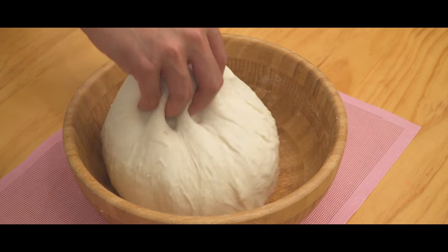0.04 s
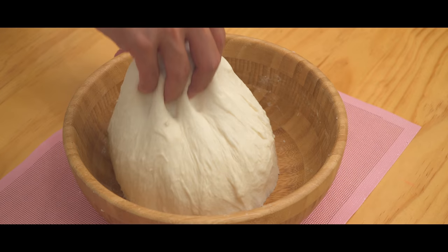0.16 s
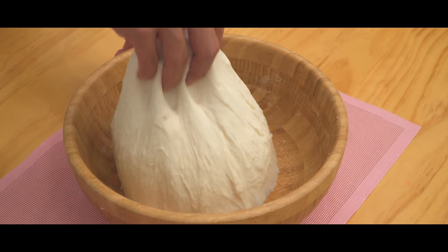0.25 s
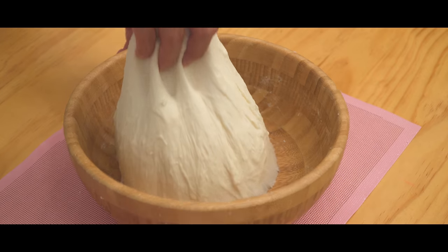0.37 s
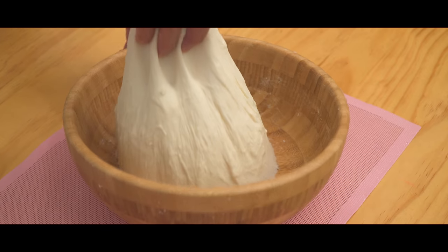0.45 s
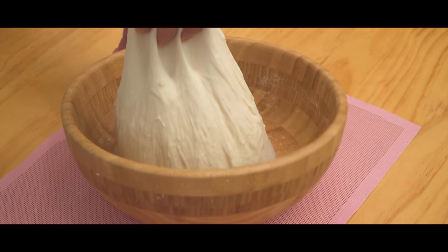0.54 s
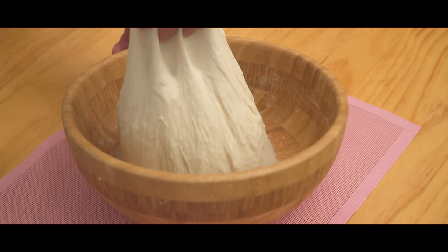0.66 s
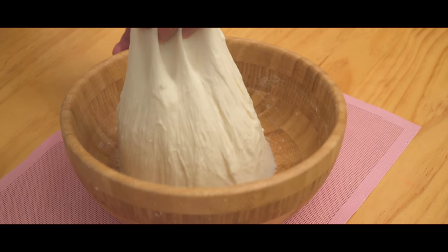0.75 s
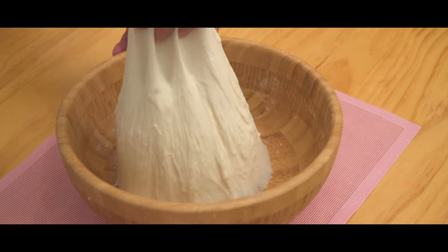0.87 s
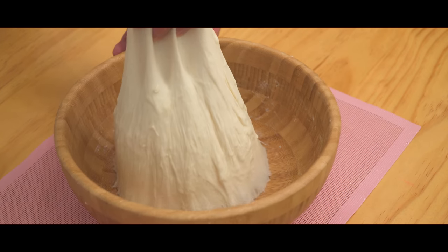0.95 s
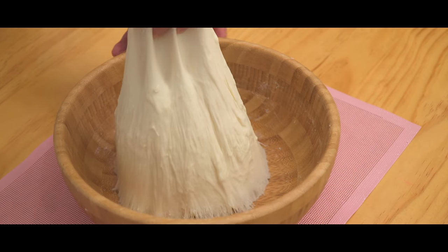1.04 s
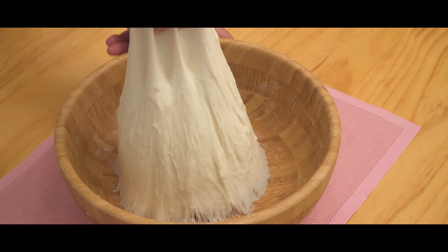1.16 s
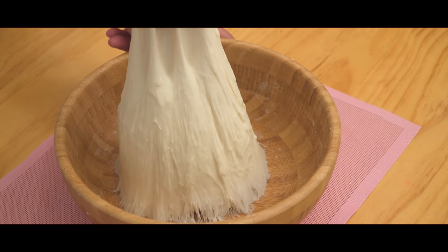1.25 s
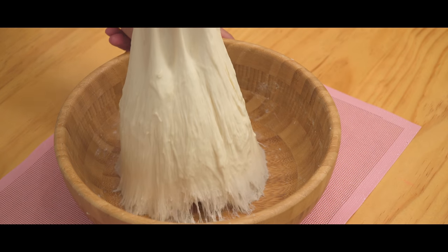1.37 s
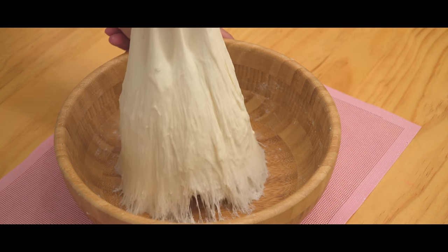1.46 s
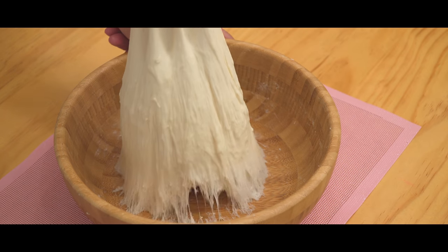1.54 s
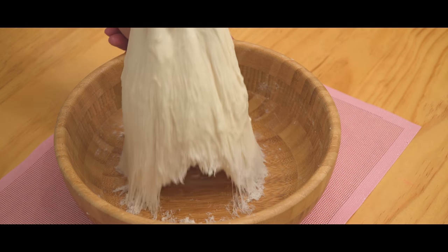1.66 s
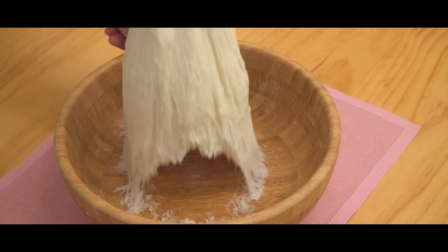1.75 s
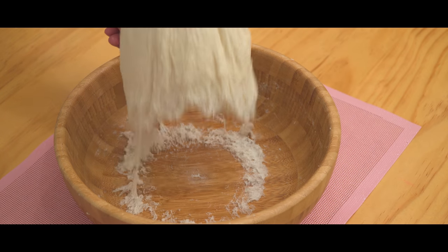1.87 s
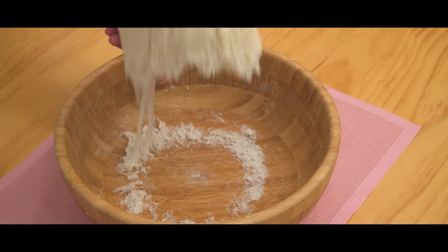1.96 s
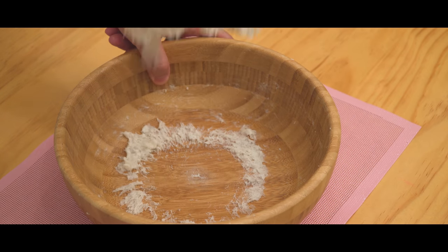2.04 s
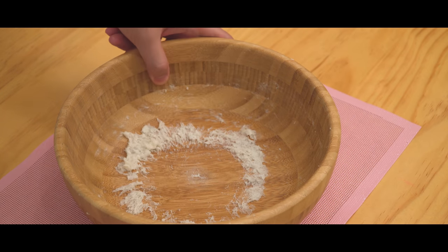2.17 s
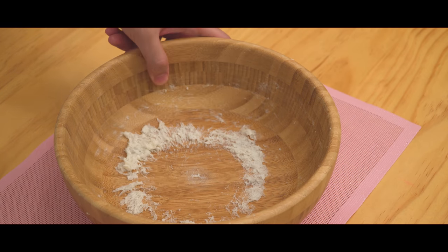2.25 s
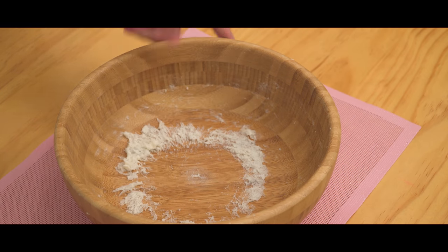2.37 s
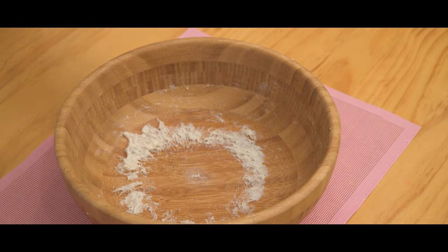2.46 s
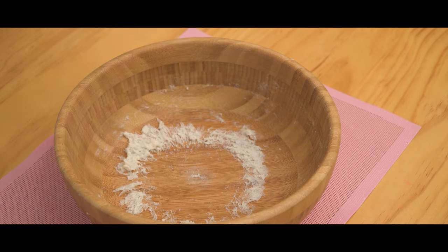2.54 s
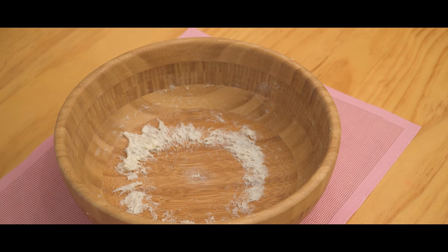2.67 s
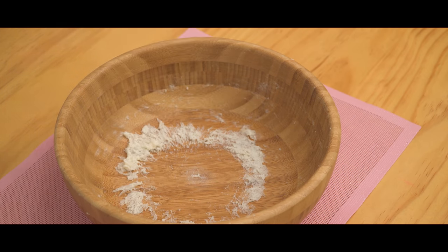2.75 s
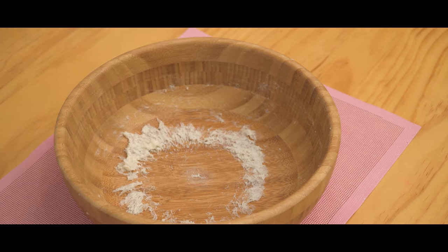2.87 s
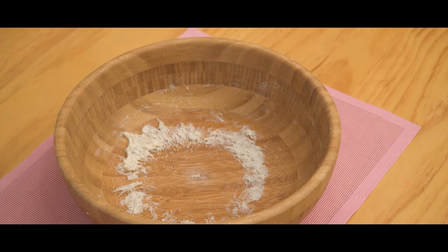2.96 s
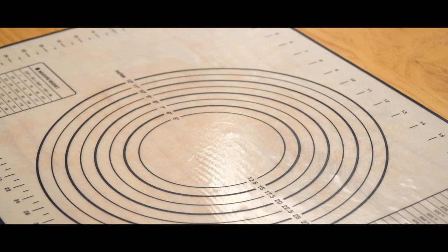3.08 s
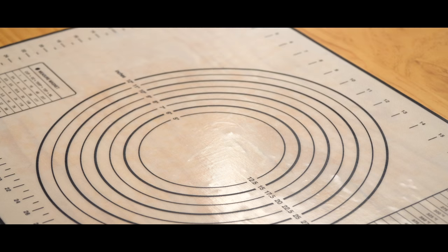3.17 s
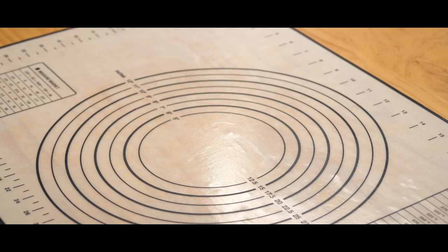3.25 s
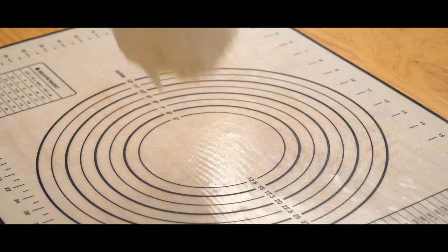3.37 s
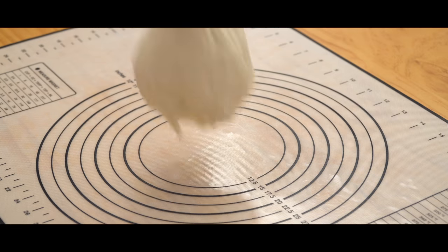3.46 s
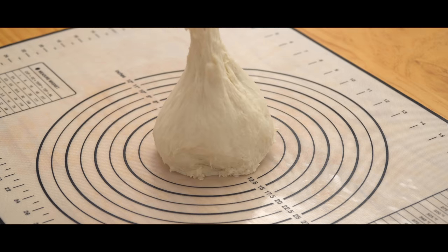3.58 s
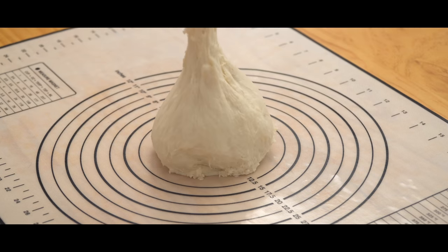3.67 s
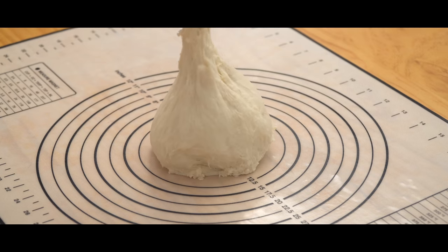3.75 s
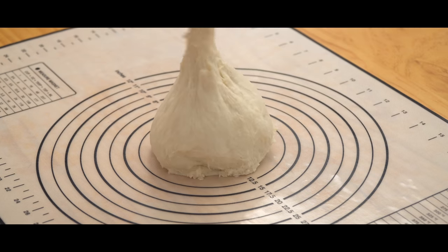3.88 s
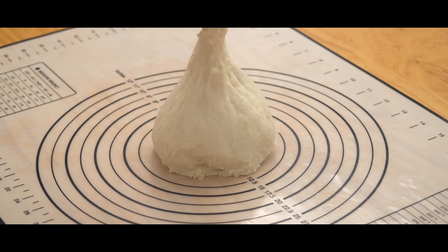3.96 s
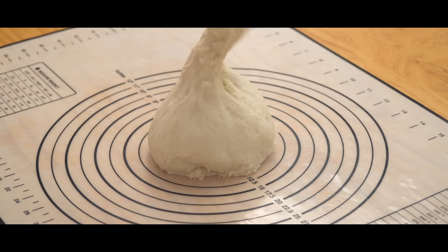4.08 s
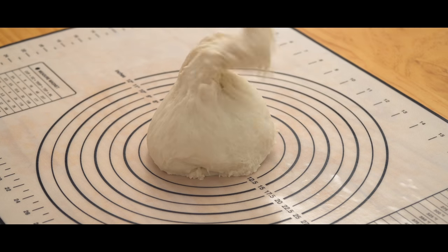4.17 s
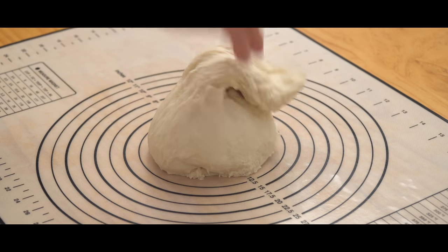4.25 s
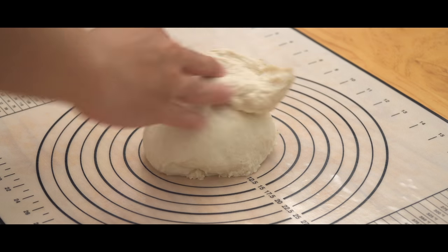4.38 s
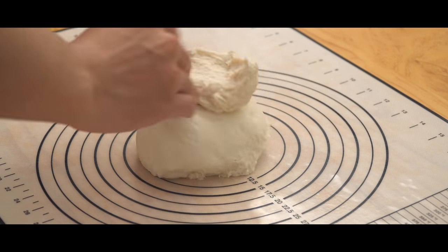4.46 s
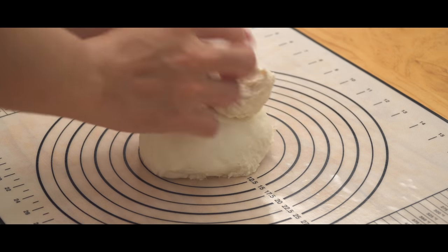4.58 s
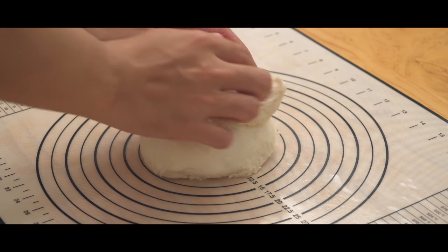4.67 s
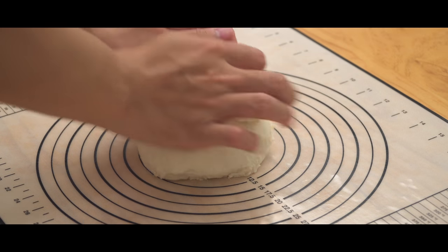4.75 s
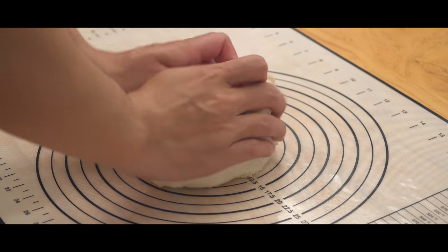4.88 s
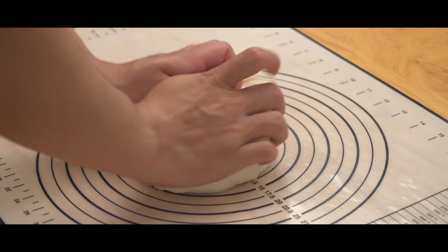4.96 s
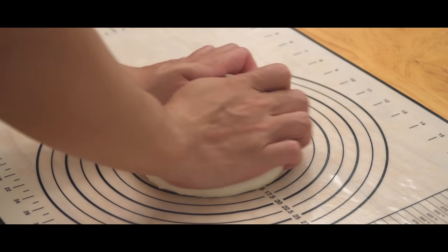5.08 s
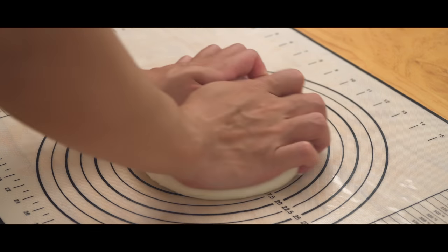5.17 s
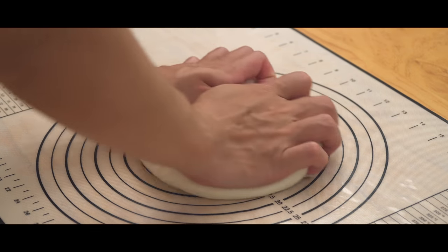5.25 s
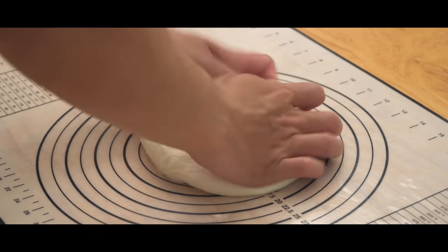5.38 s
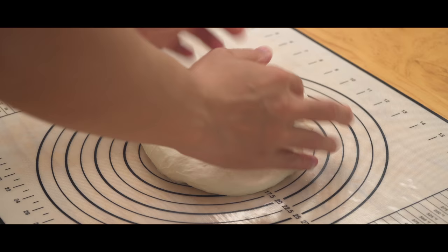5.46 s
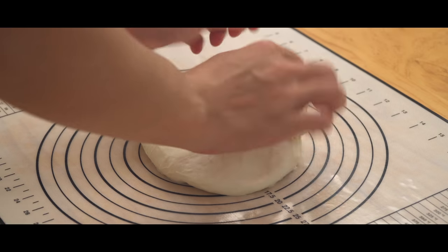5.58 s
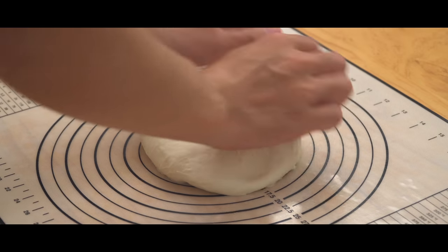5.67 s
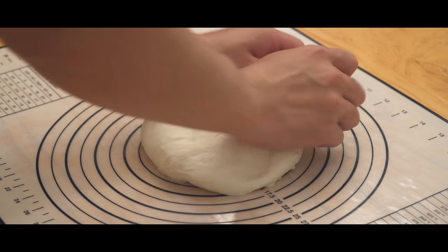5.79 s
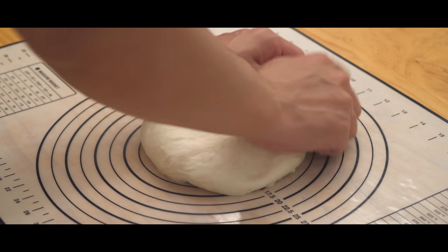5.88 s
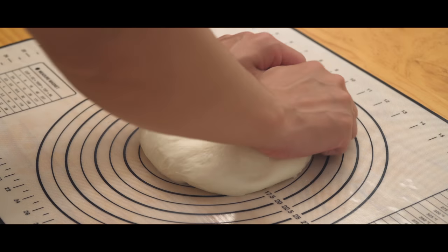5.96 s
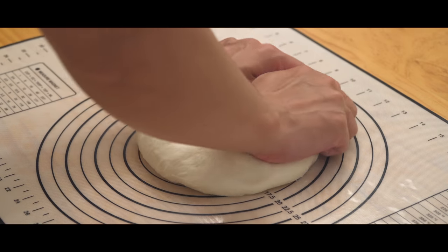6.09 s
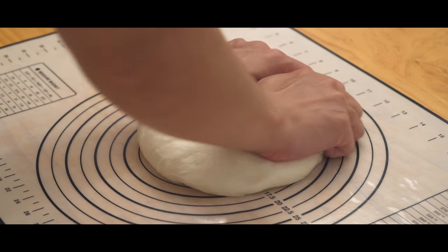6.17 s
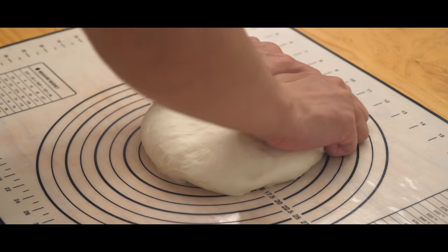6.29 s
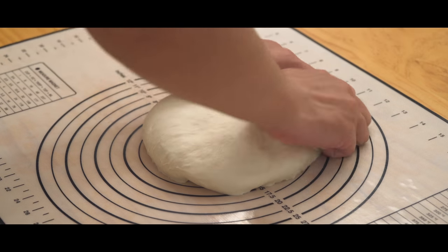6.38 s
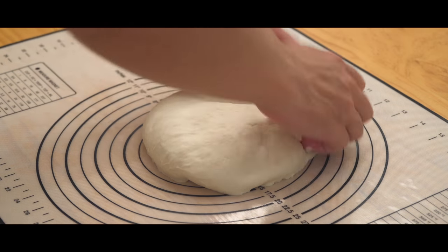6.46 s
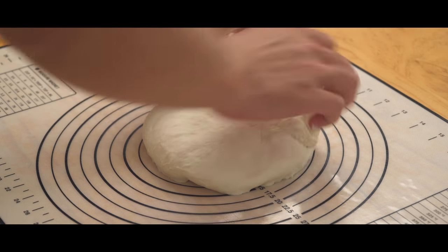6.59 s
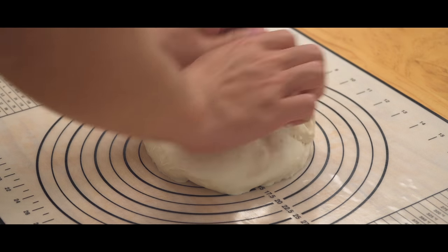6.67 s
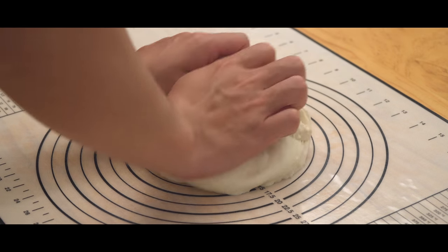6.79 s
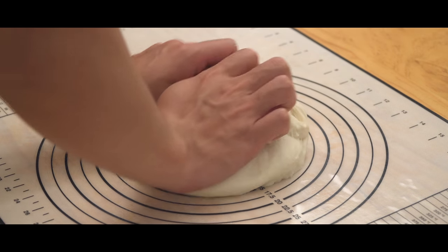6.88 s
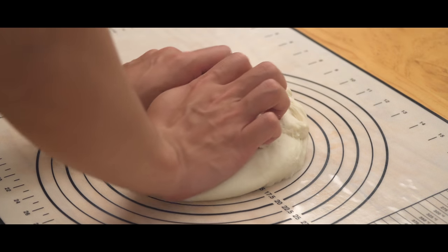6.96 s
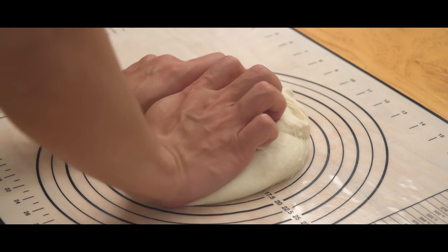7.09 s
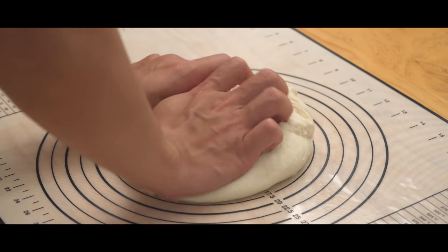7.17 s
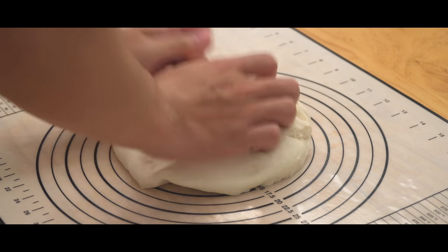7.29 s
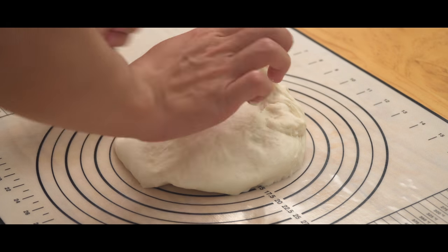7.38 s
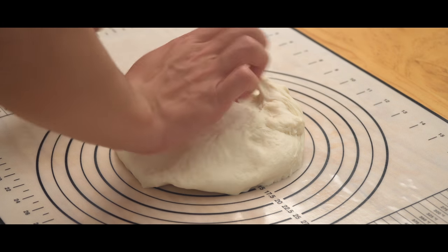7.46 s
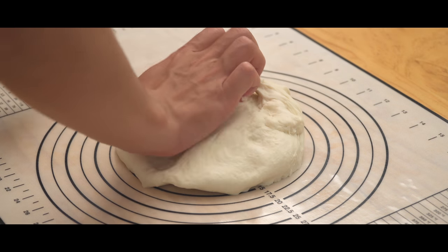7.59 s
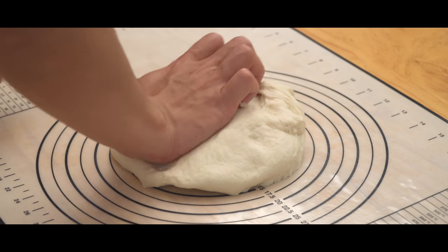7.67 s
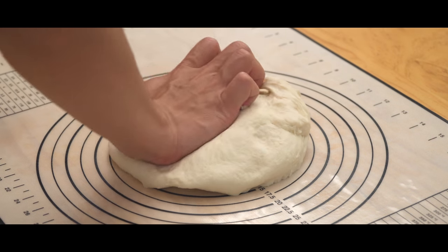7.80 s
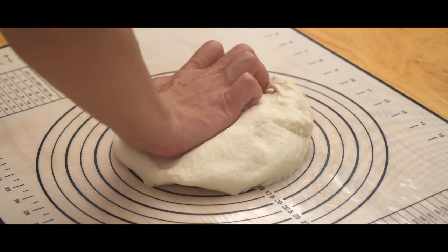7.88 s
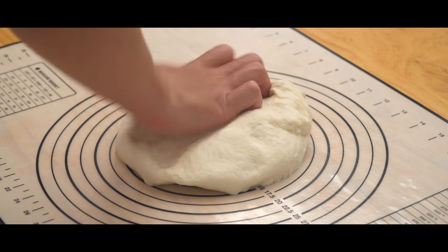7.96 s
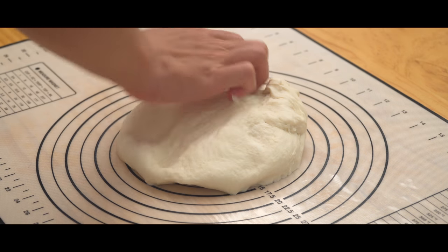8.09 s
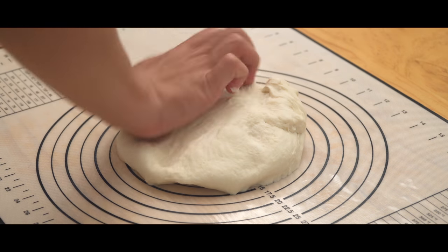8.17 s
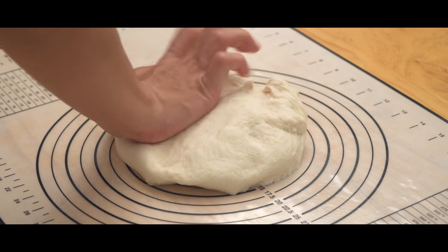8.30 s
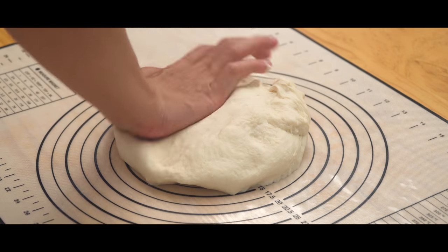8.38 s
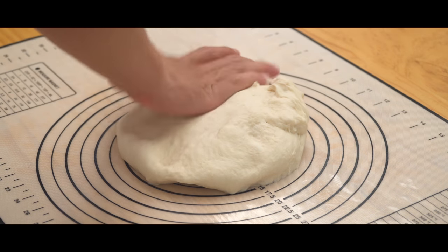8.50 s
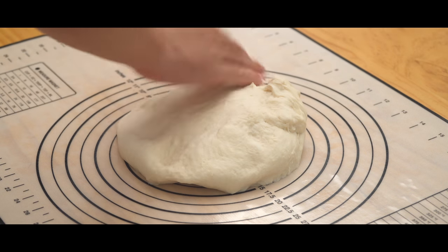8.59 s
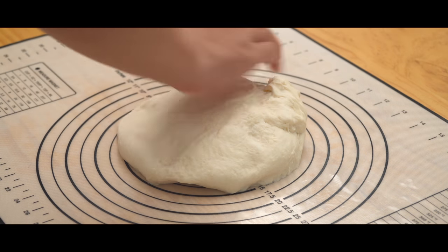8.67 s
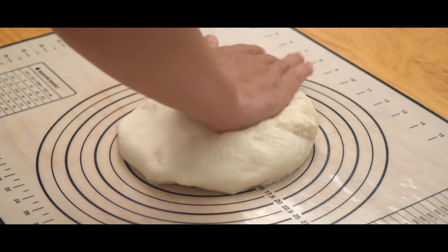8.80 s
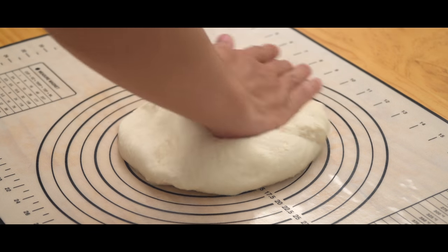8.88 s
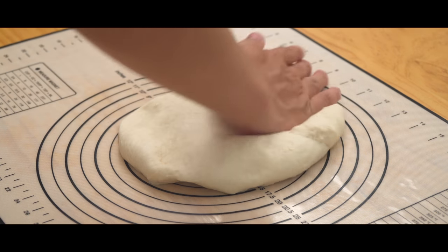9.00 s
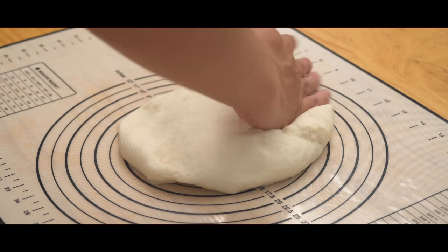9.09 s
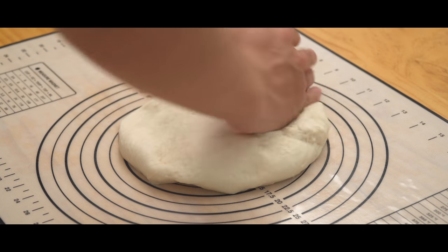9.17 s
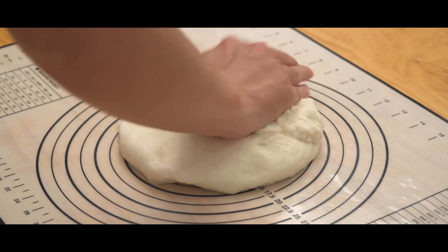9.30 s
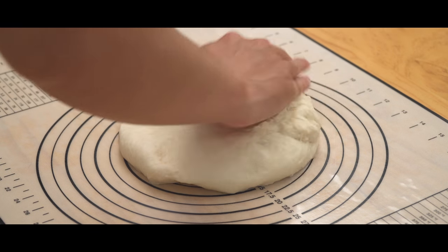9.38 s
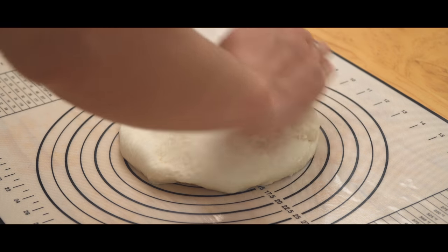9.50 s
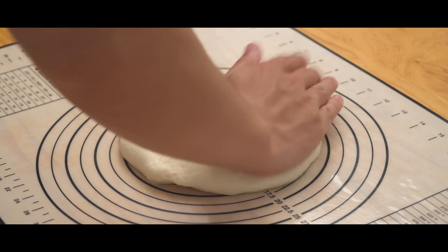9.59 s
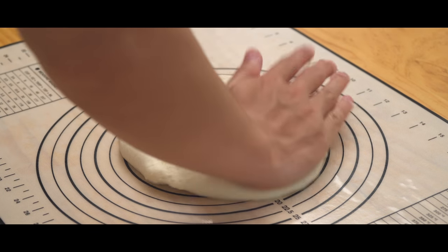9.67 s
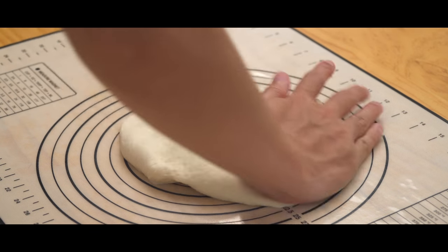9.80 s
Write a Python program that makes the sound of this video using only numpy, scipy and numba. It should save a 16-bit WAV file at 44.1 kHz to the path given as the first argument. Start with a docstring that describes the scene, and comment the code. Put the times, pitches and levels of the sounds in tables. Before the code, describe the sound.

Faint tearing of sticky strands comes first, broken by one woody bowl knock, then stillness. A weighty dough slap shakes the table, followed by irregular kneading: dull pushes, squeezed crackles, ripping adhesive peels that slide down in pitch, and tiny air pops, one of them loud. Close microphone, slight small-room echo, soft hiss and barely audible hum.

```python
"""Sticky dough peels off a mat and palm in dense snaps that ring the air gap beneath, whose pitch falls as it opens.
Slower stretching off a wooden bowl and squeezing fingers crackle as strands let go in clumps.
Air pockets pop as short decaying tones; wet smacks are brief swells of snaps in one resonance.
Blows ring modes of bowl and table, soft pushes wobble the lump, and the table sways near 50 Hz.
A small kitchen adds a diffuse echo, still air, narrow hiss and a faint mains hum."""
import sys
import numpy as np
from scipy import signal
from scipy.fft import rfft, irfft
from scipy.io import wavfile
from numba import njit

SR = 44100
rng = np.random.default_rng(int(sys.argv[2]) if len(sys.argv) > 2 else 0)


def store_pcm(level_fs):
    """Save levels as 16-bit WAV."""
    pcm = np.round(np.clip(level_fs, -1, 1) * 32767).astype(np.int16)
    wavfile.write(sys.argv[1], SR, np.atleast_2d(pcm).T)


N = 433944
T = np.arange(N) / SR  # time axis [s]

# Dough peeling off mat and palm, one row a stroke: (crest time [s], build-up [s], run-out [s],
# relative crackle level [dB], relative fine crackle level [dB], relative tug level [dB],
# nominal pitch of closed air gap [Hz], nominal pitch of open air gap [Hz])
PEELS = [(5.435, 0.081, 0.077, -42.5, -51, -36, 4300, 2400),
         (6.465, 0.085, 0.11, -45.5, -52, -38.5, 2500, 1670),
         (7.288, 0.029, 0.078, -37, -48, -33, 4460, 1800),
         (8.02, 0.039, 0.071, -40, -50, -35.5, 5300, 3670),
         (8.572, 0.077, 0.089, -44, -53.5, -37.5, 4300, 3600),
         (9.112, 0.088, 0.018, -50, -59, -44, 3600, 1500),
         (9.21, 0.033, 0.052, -54, -58.5, -51, 1700, 1620),
         (9.812, 0.011, 0.013, -44, -36.5, -47, 5500, 4900)]
# Colour of the snaps on the mat: (frequency [Hz], level [dB])
MAT_TONE = [(150, -25), (350, -7.5), (650, 2), (1200, 0.5), (1700, -0.5), (4500, -3.5), (6300, -17),
            (9000, -25), (16000, -52)]
# Colour of the fine crackle of a peel: (frequency [Hz], level [dB])
PEEL_TREBLE = [(3000, -6), (6000, -1), (8000, -2.5), (16000, -10)]
# Dough stretching off the bowl: (time [s], relative crackle level [dB])
STRETCH = [(0.0, -59), (0.23, -54), (0.25, -61), (0.52, -59), (0.66, -62.5), (0.69, -55), (0.71, -65.5),
           (1.07, -57), (1.1, -52), (1.39, -57.5), (1.9, -55), (2.0, -69)]
# Fingers gripping the dough: (middle time [s], time from middle to 1/e^2 of the gain [s],
# relative crackle level [dB], relative fine crackle level [dB], relative tug level [dB])
SQUEEZES = [(0.533, 0.12, -63.5, -58, -53), (1.62, 0.24, -75, -51, -60), (1.891, 0.093, -59.5, -52, -55),
            (3.914, 0.04, -54, -46, -75), (4.352, 0.12, -67, -75.5, -61), (4.53, 0.093, -62, -61.5, -56.5),
            (4.89, 0.26, -60.5, -54.5, -56.5), (5.147, 0.065, -62, -55, -62),
            (5.275, 0.15, -64, -60, -57.5), (5.973, 0.23, -64.5, -63.5, -55),
            (6.259, 0.09, -58.5, -60, -46.5), (7.11, 0.23, -60, -64, -55.5),
            (7.965, 0.054, -58, -51, -52.5), (9.492, 0.14, -63, -61, -48.5)]
# Colour of coarse strands: (frequency [Hz], level [dB])
STRAND_TONE = [(200, 7.5), (450, -10.5), (900, -0.5), (1700, 2.5), (2500, 0), (4500, -2), (7000, -11.5),
               (15000, -32)]
# Colour of fine fibres and of the treble echo: (frequency [Hz], level [dB])
FINE_TONE = [(2500, -18), (5000, -4), (8000, 0), (11000, -1), (14000, 0), (16000, -4)]
# Rumble of lump and table under a pull: (frequency [Hz], level [dB])
RUMBLE_TONE = [(25, -12), (60, 0), (130, -4.0), (200, -2.0), (270, -11.5), (400, -20), (800, -25.5), (3000, -49.5)]
# Air pockets bursting: (time [s], level of the ringing [dB], pitch [Hz])
POPS = [(0.9235, -38, 8000), (1.946, -36, 13100), (1.989, -41, 12000), (2.034, -34, 13200),
        (4.349, -34.5, 1730), (4.741, -34, 3100), (4.888, -33, 9000), (4.955, -32, 1520),
        (6.338, -17.5, 4060), (6.423, -13, 4000), (6.870, -32.5, 1770), (7.071, -31, 4480),
        (7.433, -31, 3740), (8.231, -36.5, 3280), (9.010, -6.5, 3860), (9.013, -19.5, 4500),
        (9.539, -32, 1350), (9.665, -27, 1760), (9.802, -31, 1820), (9.805, -14, 9200)]
# Wet smacks as dough meets or leaves a surface: (time [s], level [dB], pitch [Hz], length [s])
SMACKS = [(1.099, -54.5, 4300, 0.058), (1.218, -56, 4470, 0.067), (2.266, -64, 4470, 0.072),
          (2.33, -45, 2070, 0.0073), (3.623, -49, 2300, 0.01), (4.924, -54, 12000, 0.015),
          (5.424, -50, 4270, 0.036), (5.494, -54, 7500, 0.02), (5.511, -44, 1440, 0.015),
          (5.959, -65, 9000, .04), (6.216, -53, 1550, 0.013), (6.266, -52, 7940, 0.01),
          (6.618, -56.5, 1360, 0.034), (7.009, -53, 5750, 0.0049), (7.133, -53, 12000, 0.016),
          (7.262, -48, 3550, .02), (7.342, -48.5, 7400, 0.026), (8.007, -37.5, 4500, .012),
          (8.397, -50, 4430, 0.016), (8.4245, -49.5, 6230, 0.0075), (9.413, -58, 1830, 0.02),
          (9.658, -46, 1800, 0.015)]
# Dough and palm slapping mat and table: (time [s], knock level [dB], sway level [dB])
SLAPS = [(3.620, -18.5, -12), (6.338, -25, -34), (9.669, -27.5, -28)]
# Lifted bowl dropping back on the table: (time [s], knock level [dB], sway level [dB])
BOWL_KNOCKS = [(1.039, -39.5, -44), (1.082, -32.5, -40), (1.204, -8.5, -24)]
# Soft pushes of hand and dough: (time [s], thud level [dB], sway level [dB])
THUMPS = [(2.332, -42, -47), (4.279, -49, -58), (4.756, -48, -37), (4.804, -41, -62), (4.946, -62, -27),
          (5.488, -27, -37), (5.518, -36, -25.5), (6.221, -37.5, -39), (6.545, -31, -33),
          (6.811, -40, -36.5), (7.296, -25.5, -18.5), (7.379, -21.5, -22), (7.433, -21.5, -38),
          (7.715, -36.5, -34.5), (8.014, -31, -21.5), (8.058, -28, -31), (8.103, -31, -36),
          (8.193, -33.5, -54), (8.232, -31, -38), (8.279, -33, -25), (8.345, -29, -28.5), (8.576, -27, -22),
          (8.646, -29, -50), (8.822, -30.5, -32), (9.012, -25, -34), (9.108, -31, -50), (9.234, -34.5, -56),
          (9.463, -36, -68), (9.536, -33.5, -29), (9.668, -27, -49)]
# Modes of the wooden bowl: (nominal frequency [Hz], relative level [dB], 60 dB decay time [s])
BOWL = [(155.4, 2, 0.13), (204.3, 0.5, 0.14), (245, -14, 0.17), (305, -14, 0.12), (376, -21.5, 0.13),
        (444, -26, 0.095)]
# Modes of the table top under the mat: (nominal frequency [Hz], relative level [dB], 60 dB decay time [s])
TABLE = [(132, 5.5, 0.069), (199, 4, 0.11), (243.5, 2.5, 0.14), (309, -6.5, 0.19), (363, -19, 0.23),
         (412, -8, 0.096), (500, -7, 0.12), (868, -11, 0.084), (1567, -6, 0.044)]
# Colour of the main echo: (frequency [Hz], level [dB])
ECHO_TONE = [(60, -5.5), (300, 4.5), (4500, 0.5), (8000, 1.0), (16000, -39)]
# Colour of the still kitchen air: (frequency [Hz], level [dB])
KITCHEN = [(30, -15), (50, -2.5), (75, -8.5), (200, -13.5), (500, -20), (1000, -26), (3000, -28.5),
           (5000, -29), (6500, -35.5), (16000, -37.5)]
# Narrow bands of steady hiss: (centre [Hz], width before narrowing [Hz], level [dB])
HISS = [(3340, 200, -80), (4296, 400, -73), (5180, 320, -76)]

# Peel: breaks loose, swells to its crest, sags while dough keeps coming away, dies once free
PEEL_ATTACK_DB_PER_S, PEEL_SWELL_DB, PEEL_SAG_DB, PEEL_RELEASE_DB_PER_S = 550, 10.5, 5.5, 600
# The table feels the pull a little after the skin lets go, and settles more slowly
TUG_LAG_S, TUG_RELEASE_DB_PER_S = 0.012, 216
GAP_OPENS_S = 0.0088  # time constant of the fall in pitch around the crest
# Strands get thinner as the lump rises: fine crackle gains on coarse at this rate
THINNING_DB_PER_S = 5
# Pitch of the lump under a light hand; a sway of LEAN_DB lowers it to two thirds
THUD_HZ, LEAN_DB = 206, -16
SWAY_HZ, SWAY_T60_S = 51.43, 0.55
KITCHEN_DB, HUM_HZ, HUM_DB = -60, 100.2, -62
TOP_HZ = 15900  # upper edge of the pass-band


def peels(rate=5000, scatter_db=4.0, gap_width=0.56, gap_db=-2, mat_db=-3, fine_db=-2, jerk_db=2, flutter=0.045):
    """Adhesive peeling: jerky bond breaking excites an air cavity whose resonance falls as it opens."""
    coarse_gain, fine_gain, pull = np.zeros(N), np.zeros(N), np.zeros(N)
    gap_hz = np.full(N, float(PEELS[0][-2]))
    t = T[:SR] - .5
    for crest, build_s, run_s, crackle_db, treble_db, tug_db, closed_hz, open_hz in PEELS:
        start = crest + t[0]
        speed = stroke(t, build_s, run_s, PEEL_RELEASE_DB_PER_S)
        tug = stroke(t, build_s, run_s, TUG_RELEASE_DB_PER_S)
        add(coarse_gain, start, undb(crackle_db) * speed)
        add(fine_gain, start, undb(treble_db) * speed)
        add(pull, start + TUG_LAG_S, undb(tug_db) * tug)
        begun = T > crest - 2 * build_s
        still_closed = (1 - np.tanh((T[begun] - crest) / (2 * GAP_OPENS_S))) / 2
        gap_hz[begun] = open_hz + (closed_hz - open_hz) * still_closed
    # the same jerks move both snap strength and gap pitch
    jerk = unit(band(rng.standard_normal(N), 23, 55))
    gap_hz = gap_hz * np.exp(flutter * jerk)
    mat, gap, fine = (undb(jerk_db * jerk) * snaps(rate, scatter_db) for _ in range(3))
    for _ in range(2):
        gap = band(gap, gap_hz, gap_width * gap_hz)
    gap = unit(gap / np.sqrt(gap_hz))  # offsets the wider band at high pitch
    coarse = coarse_gain * (undb(gap_db) * gap + undb(mat_db) * colour(mat, MAT_TONE))
    fine = fine_gain * undb(fine_db) * colour(fine, PEEL_TREBLE)
    return coarse + fine + tugs(pull, knock_db=6.5, sway_db=3.0)


def stroke(t, build_s, run_s, release):
    """Envelope of one peel at t seconds from its crest: attack, swell, sag, release [dB/s]."""
    attack = PEEL_ATTACK_DB_PER_S * np.minimum(t + build_s, 0)
    swell = PEEL_SWELL_DB * np.clip(t / build_s, -1, 0)
    sag = PEEL_SAG_DB * np.clip(t / run_s, 0, 1)
    return undb(attack + swell - sag - release * np.maximum(t - run_s, 0))


def stretch(release_s=0.047):
    """Viscoelastic stretching: one long pull out of the bowl thins the strands, shifting energy to fine crackle."""
    s, db = np.transpose(STRETCH)
    pull = undb(np.interp(T, s, db)) * np.exp(-np.maximum(T - s[-1], 0) / release_s)
    thin = undb(THINNING_DB_PER_S * np.minimum(T, s[-1]) / 2)
    return strands(pull / thin, pull * thin, pull, rate=4500, scatter_db=4.0,
                   crackle_db=0, fine_db=-4, tug_db=-11.5)


def squeeze():
    """Intermittent deformation: each grip of the fingers swells and fades along a Gaussian."""
    coarse_gain, fine_gain, pull = np.zeros(N), np.zeros(N), np.zeros(N)
    for middle, spread_s, coarse_db, treble_db, pull_db in SQUEEZES:
        grip = np.exp(-2 * ((T - middle) / spread_s) ** 2)
        coarse_gain += undb(coarse_db) * grip
        fine_gain += undb(treble_db) * grip
        pull += undb(pull_db) * grip
    return strands(coarse_gain, fine_gain, pull, rate=1500, scatter_db=4.0,
                   crackle_db=-1.5, fine_db=-10.5, tug_db=0)


def strands(coarse_gain, fine_gain, pull, rate, scatter_db, crackle_db, fine_db, tug_db, clump_db=1.7, lone=0.4):
    """Clustered rupture: thin strands let go in clumps, with sparse lone snaps of more uneven size."""
    clumps = undb(clump_db * unit(band(rng.standard_normal(N), 15, 25)))
    coarse = coarse_gain * colour(snaps(rate, scatter_db), STRAND_TONE)
    fibres = snaps(rate, scatter_db) + lone * snaps(100, 6.2)
    fine = fine_gain * colour(fibres, FINE_TONE)
    rumble = tugs(pull, knock_db=0.5, sway_db=5)
    return clumps * (undb(crackle_db) * coarse + undb(fine_db) * fine) + undb(tug_db) * rumble


def snaps(rate, scatter_db, size=N):
    """Random impulse process: bonds break at a given rate [1/s] in uneven sizes; rms near 1."""
    strength = undb(scatter_db * np.clip(rng.standard_normal(size), -3, 3))
    chance = np.minimum(rate / SR, 1)
    breaks = rng.random(size) < chance
    return unit(strength) * rng.choice([-1, 1], size) * breaks / np.sqrt(chance)


def tugs(effort, knock_db, sway_db):
    """Forced vibration: the uneven pull of the dough keeps lump and table rumbling."""
    force = effort * snaps(700, 2.4)
    body = colour(force, RUMBLE_TONE) * np.std(force)
    legs = sway()
    swaying = signal.fftconvolve(force, legs / np.linalg.norm(legs))[:N]
    return undb(knock_db) * body + undb(sway_db) * swaying


def pops(cycles=0.49, ring_s=0.00016, crack=0.13, crack_s=0.0025, snap=0.7):
    """Damped cavity resonance: a bursting pocket snaps, rings briefly and crackles as its skin tears."""
    out, t = np.zeros(N), T[:SR // 50]
    for s, db, hz in POPS:
        pocket = np.sin(2 * np.pi * hz * t) * np.exp(-t / (ring_s + cycles / hz))
        crackle = crack * rng.standard_normal(len(t)) * np.exp(-t / crack_s)
        tear = crackle - snap * (t == 0)
        add(out, s, undb(db) * (pocket + band(tear, hz, 3 * hz)))
    return out


def smacks(rate=7000, scatter_db=5):
    """Sudden adhesion or release: a short swell of snaps excites one broad resonance."""
    out = np.zeros(N)
    for s, db, hz, length_s in SMACKS:
        size = int(max(length_s, .002) * SR)
        burst = snaps(rate, scatter_db, size=size) * signal.windows.tukey(size, .5)
        padded = np.pad(burst, (0, 64))  # room for the resonance to die
        add(out, s, undb(db) * unit(band(padded, hz, .8 * hz)))
    return out


def thumps(top_db=-13):
    """Impact excitation: each blow rings what it hits and sways the table; pushes barely wake the top."""
    blows = [(*row, slap()) for row in SLAPS]
    blows += [(*row, ring(BOWL)) for row in BOWL_KNOCKS]
    for s, db, sway_db in THUMPS:
        hand_load = undb(sway_db - LEAN_DB) ** 2 / 2  # a hand leaning harder lowers the pitch
        body = thud(THUD_HZ / (1 + hand_load)) + undb(top_db) * ring(TABLE, detune=0.053)
        blows.append((s, db, sway_db, body))
    out = np.zeros(N)
    for s, db, sway_db, body in blows:
        add(out, s, undb(db) * body)
        add(out, s, -undb(sway_db) * sway())
    return out


def slap(smear=0.44, smear_s=0.011, rush_hz=235, rush_width_hz=260):
    """Distributed impact: table modes ring through the dull noise of soft mass spreading on contact."""
    t, rush = T[:SR // 2], rng.standard_normal(SR // 2)
    for _ in range(2):
        rush = band(rush, rush_hz, rush_width_hz)
    return ring(TABLE) + smear * unit(rush) * np.exp(-t / smear_s)


def thud(hz, swell_s=0.0063, sag=0.037):
    """Damped mass-spring motion: the lump wobbles briefly under the hand and sinks in pitch; envelope peak 1."""
    t = T[:SR // 2]
    pitch_hz = hz * (1 + sag * (np.exp(-t / (2 * swell_s)) - .5))
    phase = 2 * np.pi * np.cumsum(pitch_hz) / SR
    return t / swell_s * np.exp(1 - t / swell_s) * np.sin(phase)


def ring(modes, detune=0.0057):
    """Modal superposition, peak 1: neighbouring modes start in opposite directions, so the ring swells first."""
    t, out = T[:SR // 2], 0
    for k, (hz, db, t60_s) in enumerate(modes):
        hz = hz * (1 + detune * rng.standard_normal())
        decay = np.exp(-np.log(1000) * t / t60_s)
        out = out + (-1) ** k * undb(db) * decay * np.sin(2 * np.pi * hz * t)
    return out / np.abs(out).max()


def sway(rise_s=0.0094):
    """Damped rigid-body oscillation: the whole table bounces on its legs."""
    t = T[:SR]
    decay = np.exp(-np.log(1000) * t / SWAY_T60_S)
    return np.sin(2 * np.pi * SWAY_HZ * t) * (1 - np.exp(-t / rise_s)) * decay


def room(x, wet_db, t60_s=0.53, treble_t60_s=0.45, gap_s=0.00592):
    """Diffuse reverberation: convolution with decaying noise, a treble part of which dies sooner."""
    t = T[:SR // 2]
    low = colour(rng.standard_normal(len(t)), ECHO_TONE)
    high = colour(rng.standard_normal(len(t)), FINE_TONE)
    low = low * np.exp(-np.log(1000) * t / t60_s)
    high = 0.6 * high * np.exp(-np.log(1000) * t / treble_t60_s)
    tail = (low + high) * (t > gap_s)
    return x + undb(wet_db) * signal.fftconvolve(x, tail / np.linalg.norm(tail))[:N]


def kitchen():
    """Stationary background: coloured noise for still air, narrow-band hiss and a sine for mains hum."""
    out = undb(KITCHEN_DB) * colour(rng.standard_normal(N), KITCHEN)
    for hz, width, db in HISS:
        hiss = rng.standard_normal(N)
        for _ in range(2):
            hiss = band(hiss, hz, 0.93 * width)
        out += undb(db) * unit(hiss)
    return out + undb(HUM_DB) * np.sqrt(2) * np.sin(2 * np.pi * HUM_HZ * T)


def undb(db):
    """Logarithmic level: decibels to amplitude gain."""
    return 10 ** (np.asarray(db) / 20)


def unit(x):
    """Power normalisation: scale to rms 1."""
    return x / np.sqrt(np.mean(x ** 2) + 1e-18)


def add(out, s, x):
    """Superposition: mix x into out from time s [s]."""
    i = int(np.clip(s * SR, 0, N - 1))
    out[i:i + len(x)] += x[:N - i]


def colour(x, points):
    """Spectral shaping: weight x by levels interpolated over log frequency; rms 1."""
    hz, db = np.transpose(points)
    f = np.maximum(np.fft.rfftfreq(len(x), 1 / SR), 1)
    gain = undb(np.interp(np.log(f), np.log(hz), db))
    return unit(irfft(rfft(x) * gain, len(x)))


@njit
def svf(x, hz, width):
    """State-variable resonance: a band-pass whose centre and width [Hz] may move every sample."""
    y, b, l = np.empty(len(x)), 0., 0.  # output, band state, low state
    for i in range(len(x)):
        g, k = np.tan(np.pi * min(hz[i] / SR, .45)), width[i] / hz[i]
        v = (b + g * (x[i] - l)) / (1 + g * (g + k))
        b, l, y[i] = 2 * v - b, l + 2 * g * v, k * v
    return y


def band(x, hz, width):
    """Simple resonance: band-pass with a fixed or moving centre."""
    return svf(x, hz * np.ones(len(x)), width * np.ones(len(x)))


def scene():
    """Superposition of dough, bowl and table, reverberated over the kitchen background."""
    dough = peels() + stretch() + squeeze() + pops() + smacks()
    return (room(dough + thumps(), wet_db=-16.5) + kitchen())[None]


def record(dry):
    """Band limiting: a steep elliptic low-pass removes the extreme treble."""
    return signal.sosfilt(signal.ellip(10, .2, 80, TOP_HZ, fs=SR, output="sos"), dry)


dry = scene()
out = record(dry)
store_pcm(out)
```